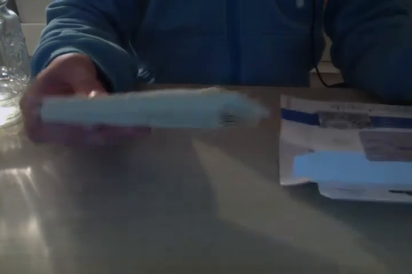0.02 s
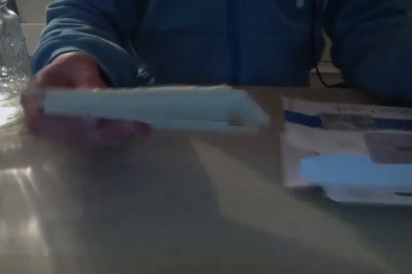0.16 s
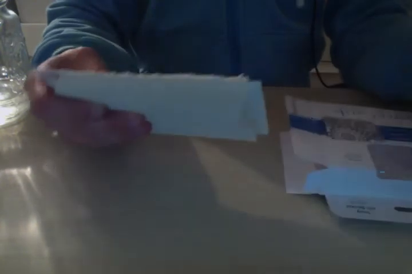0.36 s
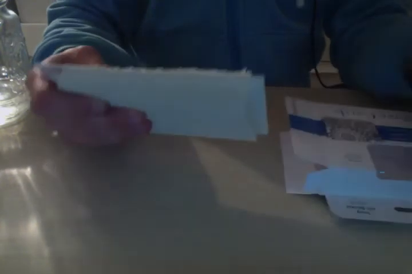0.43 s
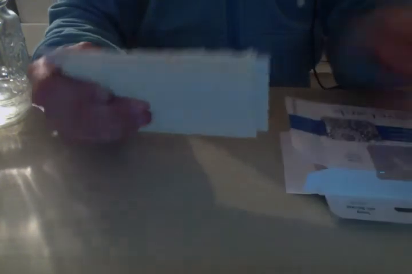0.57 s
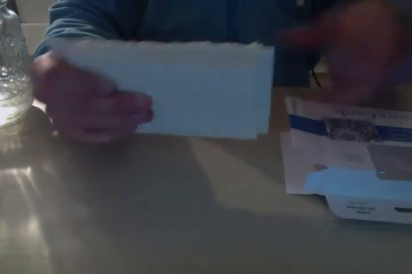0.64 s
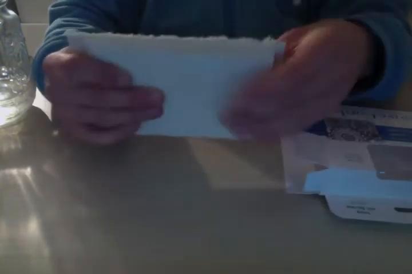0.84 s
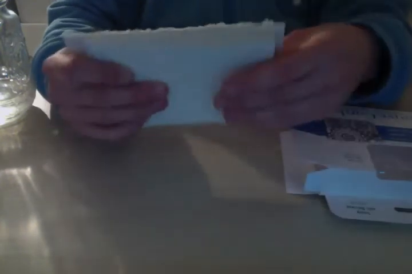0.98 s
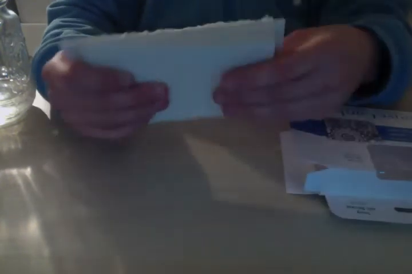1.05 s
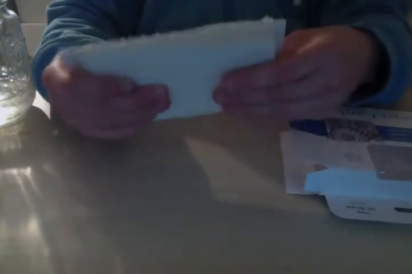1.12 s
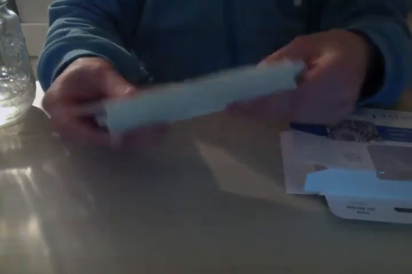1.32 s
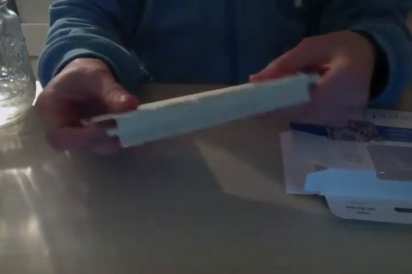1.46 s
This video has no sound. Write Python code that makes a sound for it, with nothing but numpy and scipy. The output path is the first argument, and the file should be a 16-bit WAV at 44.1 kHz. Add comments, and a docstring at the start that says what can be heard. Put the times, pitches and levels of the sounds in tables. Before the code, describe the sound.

A stack of paper cards lands on a table with one sharp, ragged knock after a brief scuff. Fingers then shift on the stack with tiny ticks and soft swishes, in a small, quiet room with a low hum.

```python
"""A stack of paper cards is tipped upright over a table in a small, quiet room. Friction makes the cards
scuff as they slide; then their edges land in one sharp, ragged knock that excites the modes of stack
and table. Fingers shift on the stack with tiny ticks and brush along it in soft swishes. The walls
reflect these sounds, over a low mains hum and the room's air."""
import sys
import numpy as np
from scipy import signal
from scipy.fft import rfft, irfft, next_fast_len
from scipy.io import wavfile
from scipy.ndimage import map_coordinates

SR = 44100
rng = np.random.default_rng(int(sys.argv[2]) if len(sys.argv) > 2 else 0)


def wav_record(signal):
    """Record a signal, one row per channel, as 16-bit PCM in the file named by sys.argv[1]."""
    frames = np.transpose(np.atleast_2d(signal))
    bounded = np.clip(frames, -1, 1)
    # unit amplitude maps onto the largest positive 16-bit level
    quanta = np.round(bounded * 32767).astype(np.int16)
    wavfile.write(sys.argv[1], SR, quanta)


N = 66150


def amp(db):
    """Decibels to amplitude ratio."""
    return 10 ** (np.asarray(db) / 20)


def unit(x):
    """Scale to rms 1."""
    return x / np.sqrt(np.mean(x ** 2) + 1e-20)


def along(points, hz):
    """Interpolate (Hz, value) points on a log-frequency axis."""
    f, v = np.transpose(points)
    return np.interp(np.log(hz + 1), np.log(f + 1), v)


def bump(hz, centre, octaves):
    """A bell of height 1 on the log-frequency axis."""
    return np.exp(-(np.log2((hz + 1) / centre) / octaves) ** 2)


def since(start):
    """Seconds since start, zero before it."""
    return np.maximum(np.arange(N) / SR - start, 0)


def decay(t, t60):
    """Exponential decay by 60 dB in t60 seconds."""
    return amp(-60 * t / t60)


def filtered(x, gain):
    """Multiply the spectrum of x by gain(hz)."""
    size = next_fast_len(N + SR // 2)
    return irfft(rfft(x, size) * gain(np.fft.rfftfreq(size, 1 / SR)), size)[:N]


def noise(spectrum, extra_db=lambda hz: 0):
    """Coloured noise of rms 1."""
    return unit(filtered(rng.standard_normal(N), lambda hz: amp(along(spectrum, hz) + extra_db(hz))))


def wobble(rate):
    """A smooth random curve with rate knots a second."""
    return map_coordinates(rng.standard_normal(4096), [np.arange(N) * rate / SR], mode="wrap")


def stroke(start, rise, hold, fall):
    """Envelope of one rubbing movement."""
    swell = np.sin(np.pi / 2 * np.minimum(since(start) / rise, 1)) ** 2
    return swell * decay(since(start + rise + hold), fall)


# Spectra of the scuff and its hiss. Each row: frequency in Hz, level in dB.
SCUFF_SPECTRUM = [(50, -50), (150, -11.5), (400, -15), (630, -3.5), (900, -3), (1300, -2.5), (1720, -3.5),
                  (2000, -4), (2450, -5), (3000, -12.5), (5500, -15), (7500, -25.5), (10000, -65.5),
                  (15500, -60.5)]
HISS_SPECTRUM = [(500, -57), (2500, 0.5), (5500, 1), (8500, -4.5), (10500, -13.5), (13000, -11),
                 (15500, -30)]
# Cards sliding. Each row: start, rise, hold and fall T60 in seconds, level in dB, relative hiss in dB.
CARD_SLIDES = [(-.02, 0.028, 0.023, 0.13, -54, 2.5), (.008, 0.023, 0.01, 0.034, -43.5, -1.5),
               (0.04, .02, .058, 0.06, -49.5, -6), (.11, .006, .008, 0.27, -37, -33),
               (.147, .012, 0.012, 0.04, -33, -9)]

def card_slides(grain_db=1.0, grain_hz=600):
    """Stick-slip friction: card catches on card in tiny slips, a hollow scuff with a hiss above it."""
    out = np.zeros(N)
    for start, rise, hold, fall, db, hiss_db in CARD_SLIDES:
        grain = unit(amp(-grain_db * wobble(grain_hz)))
        scuff = noise(SCUFF_SPECTRUM) + amp(hiss_db) * noise(HISS_SPECTRUM)
        out += amp(db) * stroke(start, rise, hold, fall) * grain * scuff
    return out


# The air's spectrum and the hum's partials. Each row: frequency in Hz, level in dB.
AIR_SPECTRUM = [(15, -37), (25, -25.5), (137, 4), (324, 1.5), (500, -5), (672, -7), (857, -1.5), (1010, -8),
                (1390, -11), (1680, -1.5), (1930, -10), (2890, -15), (3130, -13), (3780, -13.5),
                (4100, -17), (7630, -28.5), (8270, -31), (14200, -39), (15800, -47)]
HUM_PARTIALS = [(120, -66.5), (180, -68.5), (241, -74.5), (292, -69.5)]

def air_and_hum(air_db=-59, waver_db=0.5, waver_hz=7.9):
    """Superposition: the slightly wavering tones of mains hum add to the steady noise of room air."""
    hum = np.zeros(N)
    for hz, db in HUM_PARTIALS:
        peak = np.sqrt(2) * amp(db + waver_db * wobble(waver_hz))
        hum += peak * np.sin(2 * np.pi * (hz * since(0) + rng.random()))
    return amp(air_db) * noise(AIR_SPECTRUM) + hum


# Modes of stack and table top. Each row: frequency in Hz, level in dB, T60 in seconds.
TABLE_MODES = [(162, -25.5, 0.24), (202.6, -3, 0.06), (343, -24, 0.21), (541, -22.5, 0.14),
               (636.4, -5.5, 0.046), (820, -7, 0.055), (867, -14.5, 0.048), (1130, -24, 0.086),
               (1309, -6, 0.037), (1391, -4, 0.041), (2182, -5.5, 0.044), (2325, -18, .04)]
# Spectrum of an edge's slap. Each row: frequency in Hz, level in dB.
SLAP_SPECTRUM = [(60, -36), (150, -6), (400, -13.5), (800, 0), (1400, -4), (1850, -7.5), (2600, -8.5),
                 (4500, -13), (7000, -17.5), (10000, -25), (15500, -38)]
# Edges striking the table or each other. Each row: start in seconds, level in dB, contact time in ms.
EDGE_IMPACTS = [(.0502, -28, 0.096), (.1125, -37, 0.6), (.1165, -24, 0.17), (0.2078, -2.5, 0.095),
                (0.2121, 0.5, 0.062), (0.215, -2, 0.2), (.2178, -9, 0.055), (.2228, -10.5, 0.083),
                (0.9917, -43, .03)]

def edge_knocks(ring_db=-11.5, slap_db=-6.5, slap_t60=0.017, attack_s=0.00029, thump_hz=300, low_hz=146):
    """Impact excitation: each edge slaps and rings damped modes; longer contact gives less treble."""
    out = np.zeros(N)
    for start, db, contact_ms in EDGE_IMPACTS:
        t = since(start)
        ring = np.zeros(N)
        for hz, mode_db, t60 in TABLE_MODES:
            thump_db = 0.4 * db * (hz < thump_hz)  # light touches barely move the low modes
            gain = amp(mode_db + rng.normal(0, 1) + thump_db)
            ring += gain * decay(t, t60) * np.sin(2 * np.pi * hz * t)
        slap = noise(SLAP_SPECTRUM) * decay(t, slap_t60)
        blow = (amp(ring_db) * ring + amp(slap_db) * slap) * (1 - np.exp(-t / attack_s))
        pole = np.exp(-np.pi * 1e3 / (contact_ms * SR))
        out += amp(db) * signal.lfilter([1 - pole], [1, -pole], blow)
    # A high-pass thins the knock's deep bass below low_hz.
    return signal.sosfilt(signal.butter(5, low_hz, "high", fs=SR, output="sos"), out)


# Echoes from the nearest walls. Each row: delay in seconds, level in dB.
WALL_ECHOES = [(0.0104, -25), (0.0226, -20), (.028, -15), (.033, -24)]

def wall_echoes(x):
    """Early reflection: each wall returns a delayed, weaker copy."""
    return filtered(x, lambda hz: sum(amp(db) * np.exp(-2j * np.pi * hz * s) for s, db in WALL_ECHOES))


# Reverberation times. Each row: frequency in Hz, T60 in seconds.
REVERB_TIMES = [(150, 0.35), (400, 0.38), (900, 0.35), (2000, 0.34), (5000, 0.25), (9000, 0.19),
                (15000, 0.1)]
# Colour of the reverberation. Each row: frequency in Hz, gain in dB.
REVERB_SPECTRUM = [(80, -3), (150, 4), (220, -9), (450, 2.5), (800, -3), (1400, -7), (3000, -7),
                   (8000, -3.5), (15000, 1)]

def reverberation(x, delay_s=0.0017, build_s=0.0056):
    """Diffuse reflection: the walls' answer builds quickly, then decays, treble first."""
    hz, t, bands = signal.stft(rng.standard_normal(N), SR, nperseg=256)
    bands = bands * decay(t, along(REVERB_TIMES, hz)[:, None])
    tail = signal.istft(bands, SR, nperseg=256)[1][:N]
    tail = filtered(tail / np.linalg.norm(tail), lambda f: amp(along(REVERB_SPECTRUM, f)))
    build = 1 - np.exp(-since(delay_s) / build_s)
    return signal.fftconvolve(x, tail * build)[:N]


# Modes of a flicked card corner. Each row: frequency in Hz, level in dB, T60 in seconds.
CORNER_MODES = [(2390, 1.5, 0.033), (3610, -3.5, 0.024), (4756, -0.5, 0.025), (7070, -2.5, 0.03),
                (8780, -2, 0.03)]
# Spectrum of the snap. Each row: frequency in Hz, level in dB.
SNAP_SPECTRUM = [(50, -33), (200, -48), (800, 5.5), (3000, -4), (6500, -3.5), (9000, -7), (11500, -11.5),
                 (15500, 1)]
# Corner and fingertip ticks, and a small knock near 1.25 s. Each row: start in seconds, level in dB, pitch in
# Hz, snap cutoff in Hz.
CORNER_TICKS = [(0.365, -60.5, 7000, 12000), (.529, -46.5, 2480, 4500), (0.5307, -47, 4630, 5960),
                (0.5647, -50.5, 3800, 7000), (0.585, -52.5, 3580, 5000), (0.609, -52, 1620, 3000),
                (0.629, -52, 3170, 5100), (0.65, -51, 2400, 4500), (.7565, -53.5, 6840, 7500),
                (.943, -70, 14500, 15200), (0.961, -56.5, 6900, 14000), (0.9899, -45.5, 5500, 15000),
                (0.998, -46.5, 6650, 15100), (0.9992, -43.5, 5000, 15000), (1.002, -47, 6240, 14000),
                (1.249, -41.5, 740, 6000), (1.287, -44.5, 4080, 9000)]

def corner_ticks(rise_s=0.00061, snap_t60=0.02, peak_db=14.5, ring_db=-7):
    """Free vibration: a short, dry snap leaves the card's modes near its pitch ringing."""
    out = np.zeros(N)
    for start, db, pitch, cutoff in CORNER_TICKS:
        t = since(start)
        snap = noise(SNAP_SPECTRUM, lambda hz: peak_db * bump(hz, pitch, octaves=0.4)
                     - 10 * np.log10(1 + (hz / cutoff) ** 8))  # fourth-order low-pass
        ring = sum(amp(mode_db) * bump(hz, pitch, octaves=1.36) * decay(t, t60)
                   * np.sin(2 * np.pi * hz * t) for hz, mode_db, t60 in CORNER_MODES)
        attack = 1 - np.exp(-t / rise_s)
        out += amp(db) * attack * (snap * decay(t, snap_t60) + amp(ring_db) * ring)
    return out


# Spectra of skin on paper and its fine sizzle. Each row: frequency in Hz, level in dB.
SWISH_SPECTRUM = [(50, -35), (200, 0), (700, 5), (2000, 1), (3200, 8), (5000, 5), (7000, 4), (8000, -1),
                  (9000, -1.5), (10500, -8.5), (12000, -7.5), (13500, -21), (15500, -32)]
SIZZLE_SPECTRUM = [(5000, -43), (10000, -27), (13000, -13), (14500, 7), (15800, 7)]
# Fingers brushing the stack. Each row: start, rise, hold and fall T60 in seconds, level in dB,
# tilt in dB per octave, relative sizzle in dB, rasp centre in Hz.
FINGER_STROKES = [(0.79, 0.0063, 0.0087, .03, -62, -2, -18, 7200),
                  (0.886, 0.048, 0.028, 0.11, -56.5, 1, -10, 5900),
                  (0.99, 0.14, 0.056, 0.17, -61, -3, -36, 5070),
                  (1.114, 0.047, .015, 0.29, -50, 7, -32, 7900),
                  (1.188, 0.054, 0.063, 0.46, -53.5, 0, -30, 6500)]

def finger_brushes(grain_db=2.0, grain_hz=300, pivot_hz=5500, rasp_db=4.5):
    """Sliding friction: skin rasps over paper fibres; the sizzle grows as the square of the pressure."""
    out = np.zeros(N)
    for start, rise, hold, fall, db, tilt, sizzle_db, rasp_hz in FINGER_STROKES:
        swish = noise(SWISH_SPECTRUM, lambda hz: tilt * np.log2((hz + 1) / pivot_hz)
                      + rasp_db * bump(hz, rasp_hz, octaves=0.58))
        pressure = stroke(start, rise, hold, fall)
        grain = unit(amp(grain_db * wobble(grain_hz)))
        sizzle = pressure * amp(sizzle_db) * noise(SIZZLE_SPECTRUM)
        out += amp(db) * pressure * grain * (swish + sizzle)
    return out


def scene(knock_send_db=-5, handling_send_db=-6.5):
    """Superposition: direct sound, its reflections and the background add at the microphone."""
    knock = edge_knocks()
    handling = card_slides() + finger_brushes() + corner_ticks()
    into_room = amp(knock_send_db) * knock + amp(handling_send_db) * handling
    reflections = wall_echoes(knock) + reverberation(into_room)
    return (knock + handling + reflections + air_and_hum())[None]


def record(dry, top_hz=15900):
    """Band limiting: the microphone passes nothing above top_hz."""
    return filtered(dry[0], lambda hz: hz < top_hz)[None]


dry = scene()
out = record(dry)
wav_record(out)
```